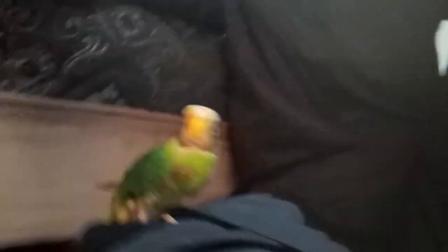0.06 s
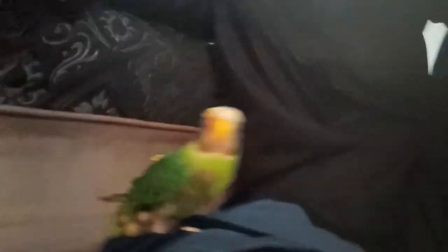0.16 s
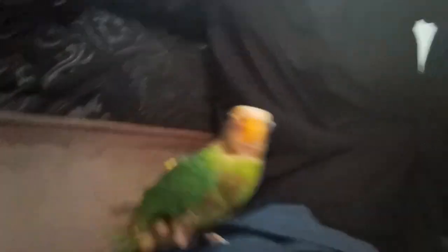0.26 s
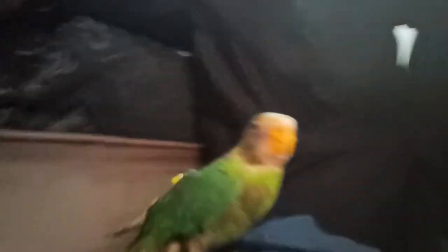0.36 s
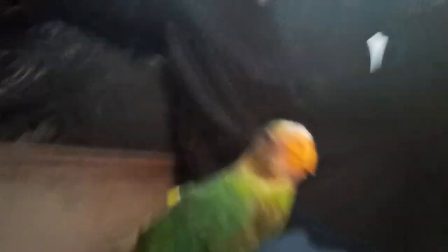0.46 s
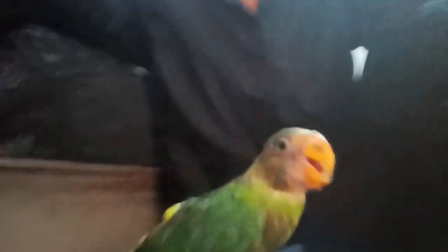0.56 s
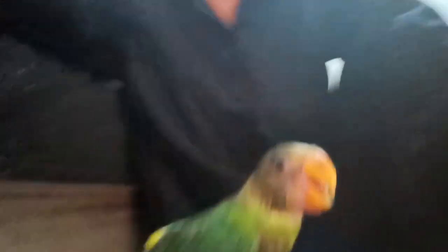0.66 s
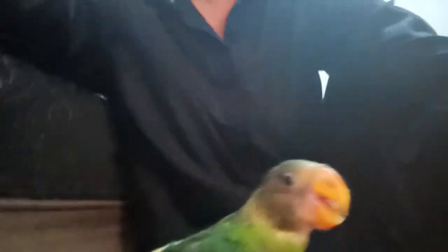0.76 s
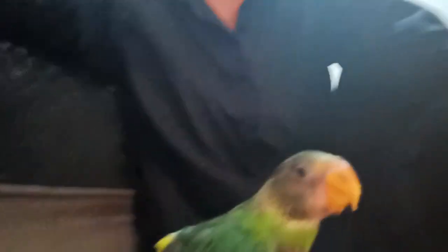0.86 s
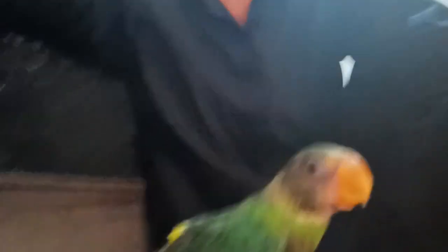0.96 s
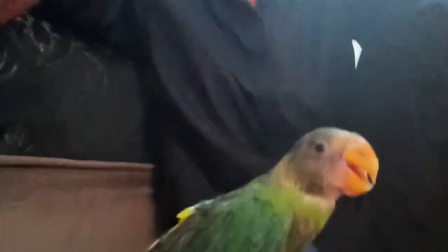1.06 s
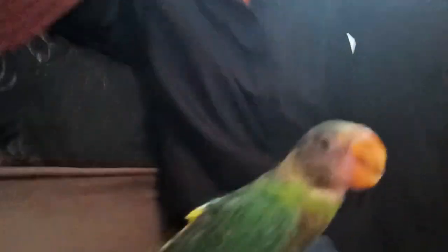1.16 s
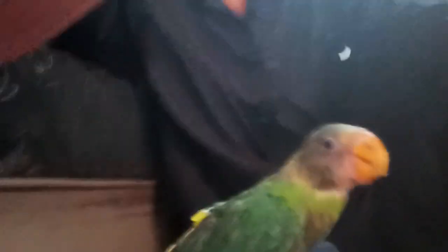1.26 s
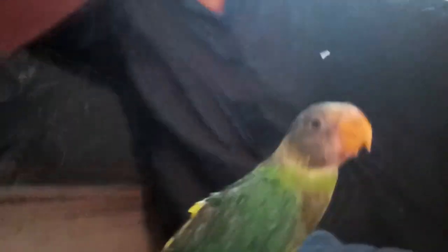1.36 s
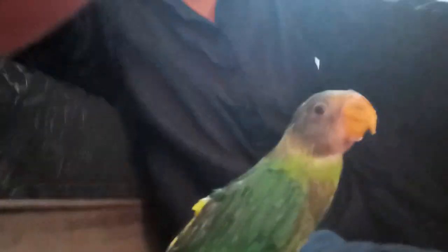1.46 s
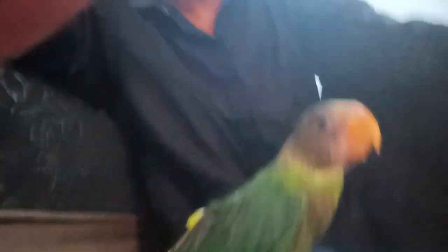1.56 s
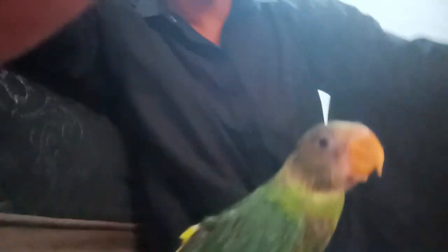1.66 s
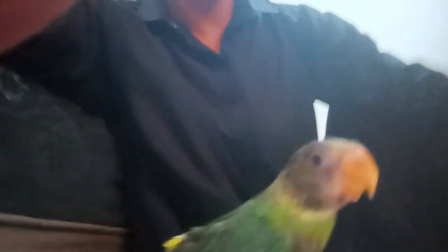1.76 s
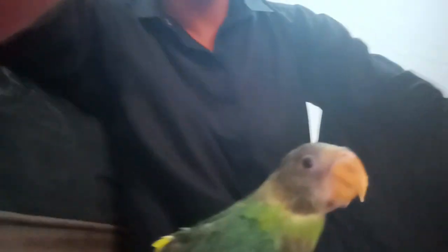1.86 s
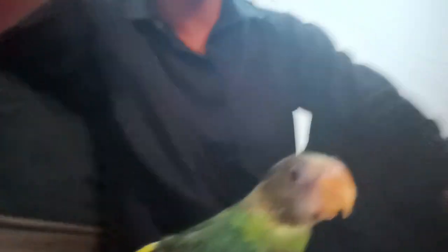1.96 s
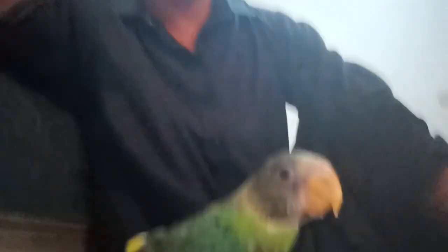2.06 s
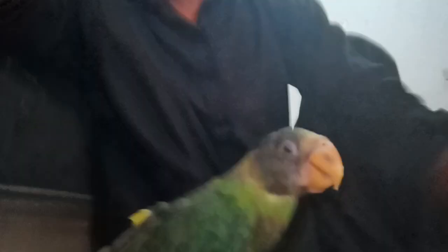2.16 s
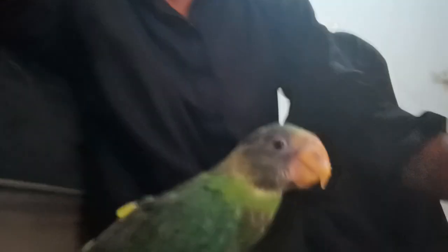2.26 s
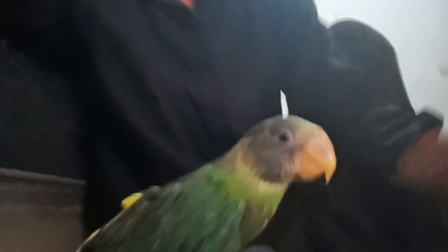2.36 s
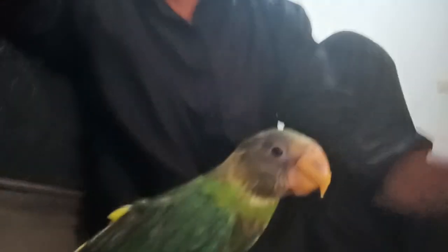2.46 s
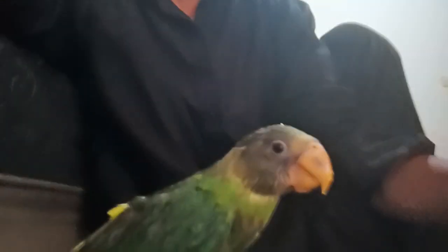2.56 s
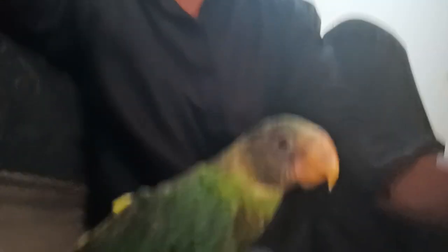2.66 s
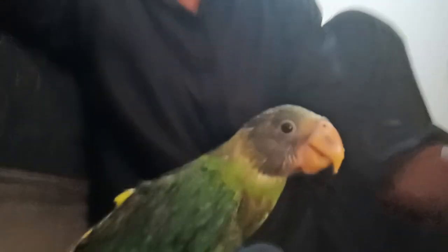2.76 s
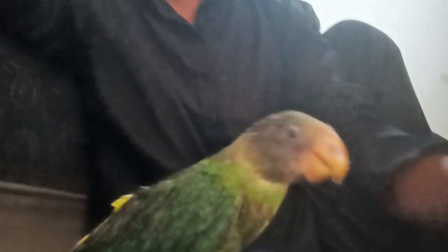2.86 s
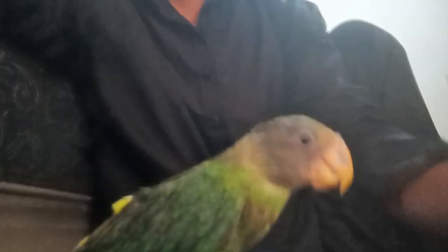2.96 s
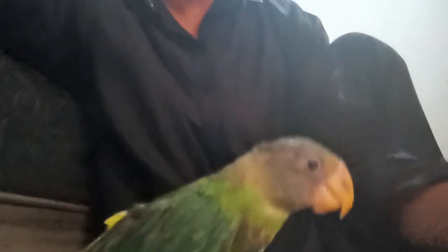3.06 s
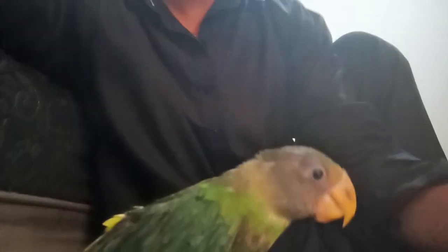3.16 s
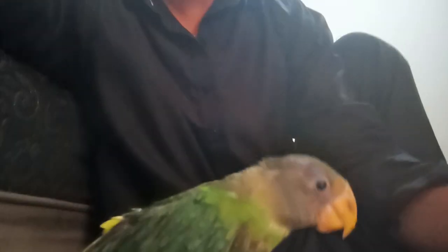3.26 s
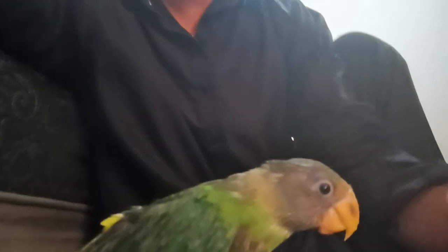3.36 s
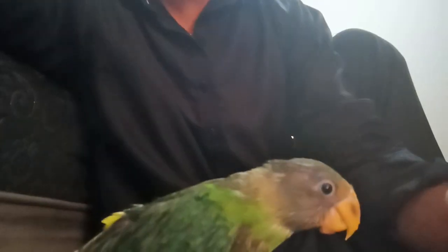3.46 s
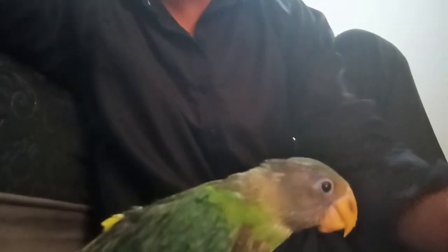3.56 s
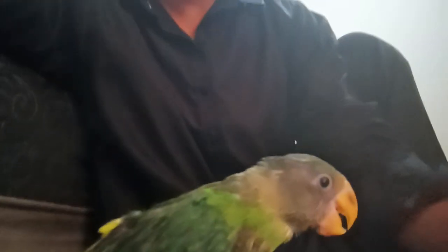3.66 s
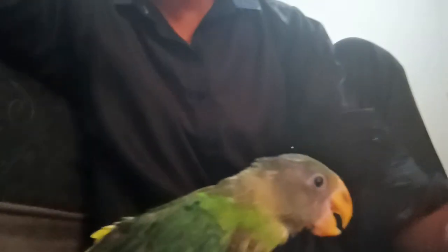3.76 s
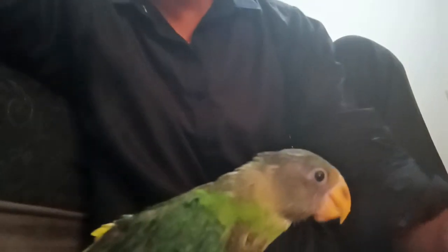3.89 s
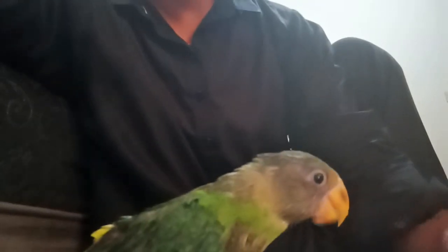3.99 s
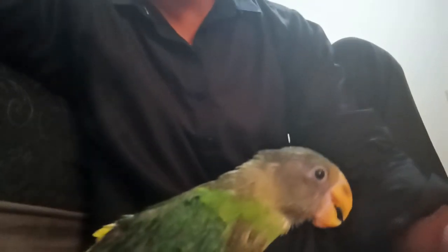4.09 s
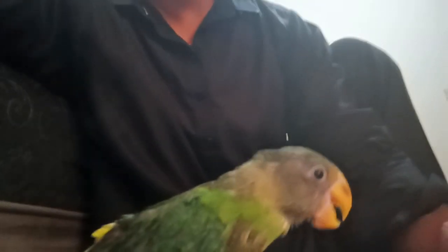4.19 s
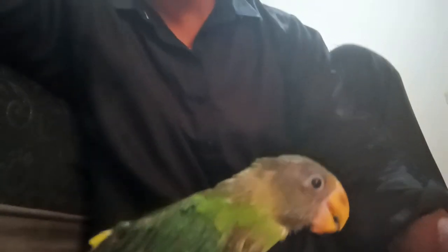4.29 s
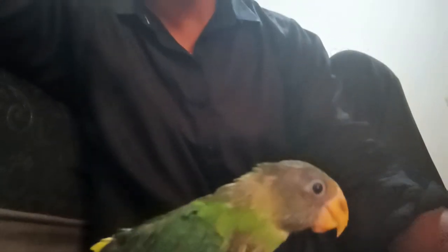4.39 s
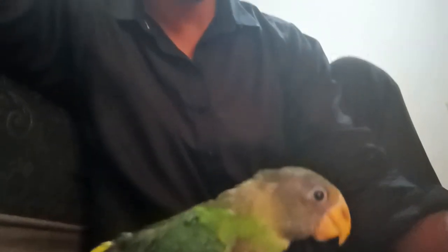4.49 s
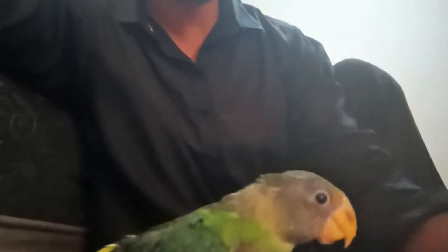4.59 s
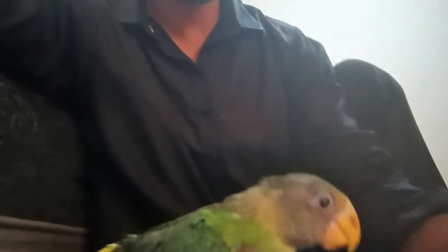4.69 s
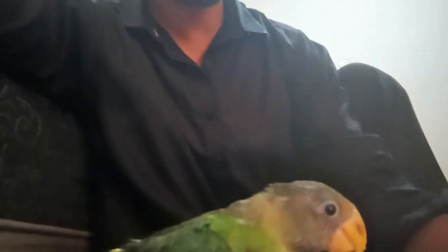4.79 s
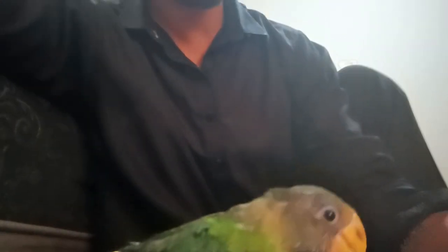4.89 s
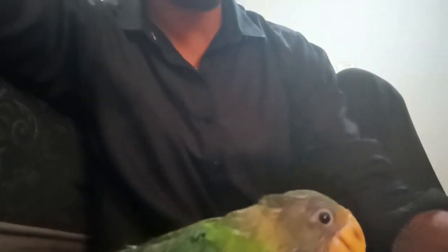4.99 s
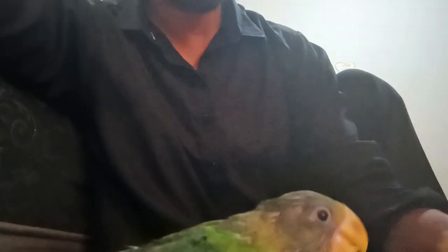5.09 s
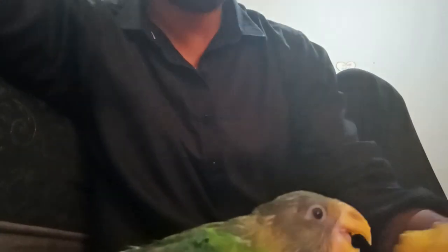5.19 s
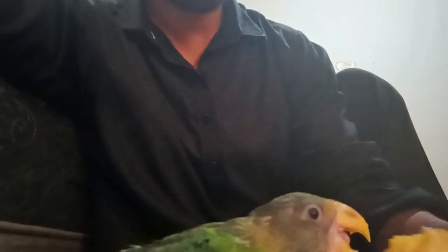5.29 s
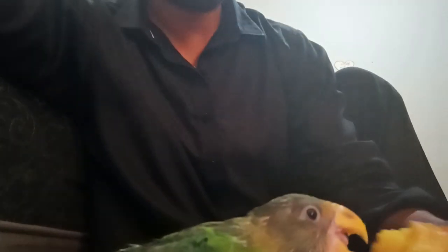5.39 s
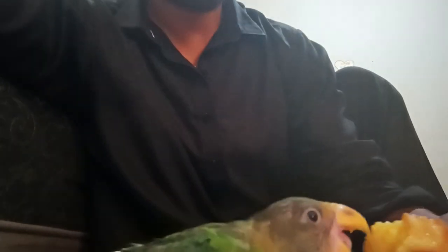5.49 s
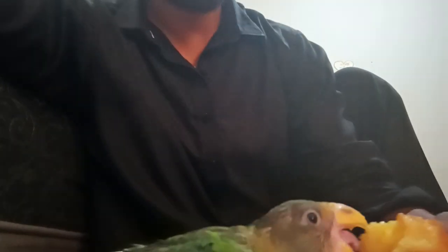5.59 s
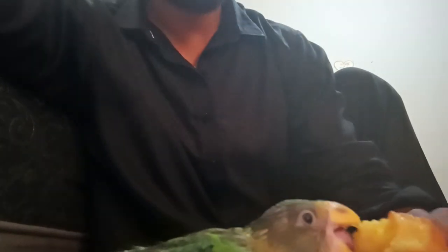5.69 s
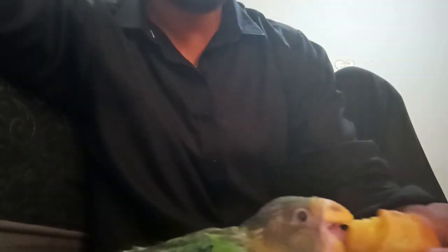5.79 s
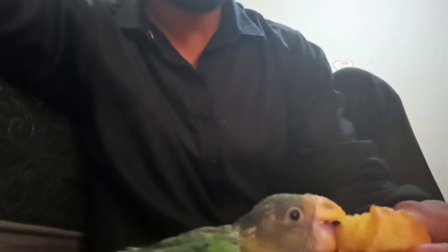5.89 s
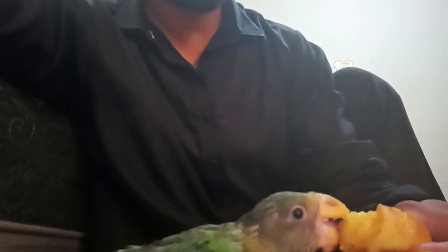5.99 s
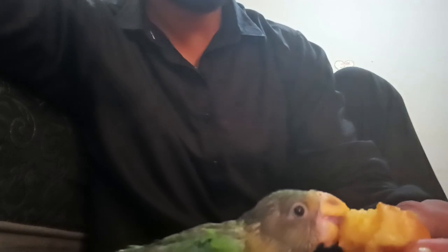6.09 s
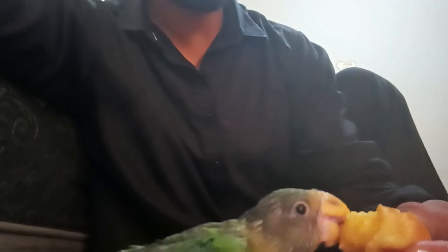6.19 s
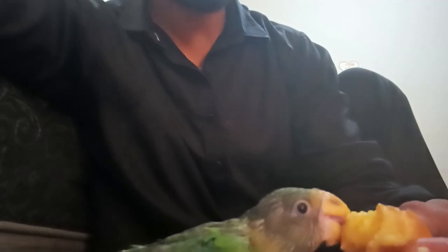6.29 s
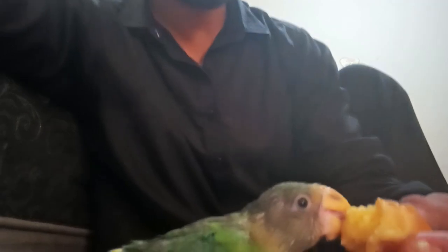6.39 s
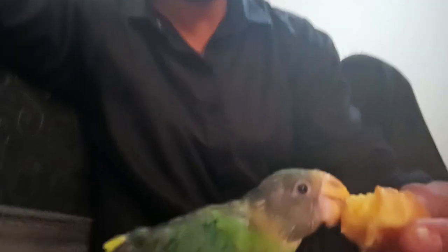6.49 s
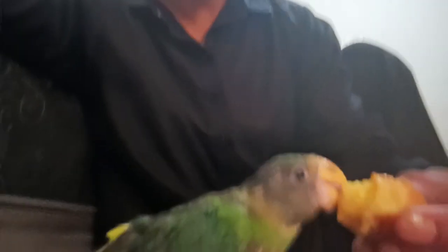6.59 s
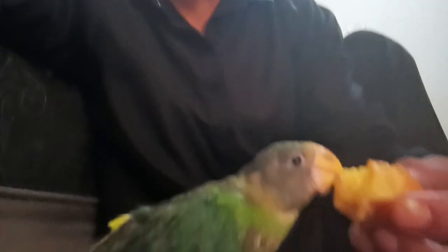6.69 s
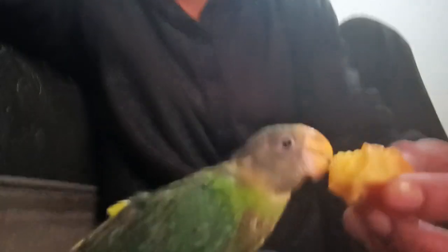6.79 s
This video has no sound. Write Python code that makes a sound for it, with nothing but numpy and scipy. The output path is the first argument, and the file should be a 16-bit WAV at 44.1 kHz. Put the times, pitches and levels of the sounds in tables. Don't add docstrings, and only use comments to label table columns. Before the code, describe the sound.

Two loud pairs of shrill, buzzing parrot calls ring out indoors, with soft handling bumps, air puffs and steady fan noise between.

```python
import sys
import numpy as np
from scipy import signal
from scipy.fft import rfft, irfft, next_fast_len
from scipy.io import wavfile
from scipy.ndimage import uniform_filter1d, minimum_filter1d

SR = 44100
rng = np.random.default_rng(int(sys.argv[2]) if len(sys.argv) > 2 else 0)


def elevation(decibels):
    levels = np.asarray(decibels, float)
    return 10 ** (levels / 20)


def generate_wav(signal):
    frames = np.transpose(np.atleast_2d(signal))
    scaled = np.clip(frames, -1, 1) * 32767
    pcm = np.round(scaled).astype(np.int16)
    wavfile.write(sys.argv[1], SR, pcm)


N = 301714
CUTOFF_HZ = 16000

# [t/s, pitch f/Hz, level/dB]
OPENINGS = [
    [(.4642, 648, -24), (.470, 730, -18), (.477, 882, -13.5), (.4805, 1070, -9), (.4815, 1150, -10.5)],
    [(.9165, 558, -16), (.921, 626, -12), (.931, 892, -18), (.9345, 1030, -15), (.937, 1260, -7.5)],
    [(3.545, 560, -27), (3.550, 759, -20), (3.558, 971, -14.5), (3.5605, 1030, -11.5), (3.5645, 1520, -10)],
    [(3.988, 636, -28), (3.998, 912, -15.5), (4.004, 1016, -21), (4.0065, 1070, -19), (4.0125, 1720, -9.5)],
]
# [t/s, pitch f/Hz, level/dB]
CLOSINGS = [
    [(.7124, 2150, -12.5), (.718, 1572, -11.5), (.727, 1290, -12), (.733, 1140, -25)],
    [(1.1465, 2990, -13.5), (1.155, 1760, -24), (1.162, 1530, -18.5), (1.173, 1170, -24)],
    [(3.7805, 3080, -11.5), (3.789, 1640, -17), (3.798, 1370, -12), (3.808, 1060, -25)],
    [(4.225, 2980, -9), (4.2315, 1700, -14), (4.238, 1390, -11), (4.246, 1200, -20)],
]
# [breath noise/dB, second overtone/dB, room/dB, gain ducking/dB,
#                    shrillness/dB per octave of overtone]
MANNER = [(-28, -3, -22, -16.5, -1), (-45, -0.5, -17, -15.5, -2), (-27.5, -3, -11, -8.5, -0.7),
          (-30.5, -2.5, -11, -6, -0.64)]


def rms_one(x):
    return x / np.sqrt(np.mean(x ** 2) + 1e-20)


def level_of(rows):
    s, db = np.transpose(rows)
    return elevation(np.interp(np.arange(N) / SR, s, db))


def at_hz(points, hz):
    points_hz, points_db = np.transpose(points)
    return np.interp(np.log(hz), np.log(points_hz), points_db)


def drift(rate, count):
    r = np.exp(-2 * np.pi * rate / SR)
    return rms_one(signal.lfilter([1], [1, -2 * r, r * r], rng.standard_normal(count + 9000))[9000:])


def coloured(spectrum, count):
    hz = np.maximum(np.fft.rfftfreq(count, 1 / SR), 1)
    return rms_one(irfft(rfft(rng.standard_normal(count)) * elevation(at_hz(spectrum, hz)), count))


def parrot():
    # [first crest t/s, first period/ms, slowing/ms per warble, head start/warbles, pitch factor]
    warbling = [(.4944, 14.83, .178, 0, 1), (.9506, 15.84, .084, -.1, .995),
                (3.578, 15.42, .036, .4, 1.005), (4.027, 15.6, .2, .9, 1.022)]
    # [t/s, crest level/dB, valley level/dB]
    efforts = [
        [(.49, -9.5, -24.5), (.52, -8, -21.5), (.54, -9.5, -18.5), (.58, -2.5, -23.5), (.65, -12.5, -21.5),
         (.70, -8.5, -16)],
        [(.945, -6.5, -19), (.96, -14, -19.5), (.99, -7, -15.5), (1.025, -9, -19), (1.1, -10.5, -21),
         (1.14, -13, -17)],
        [(3.572, -8, -33), (3.584, -11.5, -25.5), (3.6, -11, -19.5), (3.675, -9, -15.5), (3.72, -11, -20),
         (3.775, -12.5, -19)],
        [(4.018, -11, -25), (4.036, -12, -16), (4.075, -8, -11.5), (4.135, -9, -11), (4.17, -8.5, -19.5),
         (4.22, -9, -13.5)],
    ]
    # [f/Hz, level/dB]
    throat_aside = [(900, 2), (1800, 16), (2480, 30), (2800, 26), (3080, 26.5), (3600, 18.5), (4300, 21.5),
                    (5300, 16.5), (6100, 21), (7100, 10), (8200, 13.5), (9400, 0), (13000, -2.5),
                    (15200, 8.5)]
    throat_turning = [(900, 3.5), (1800, 15), (2480, 27.1), (2800, 23.4), (3080, 25.2), (3600, 19),
                      (4300, 25), (5300, 19), (6100, 21.6), (7100, 6), (8200, 17), (10500, 9.3),
                      (13500, 0.5), (15200, 14)]
    throat_facing = [(900, 8), (1800, 17.3), (2550, 21.2), (2800, 24.8), (3100, 27), (3600, 21.6),
                     (4300, 25.3), (5200, 20.2), (6200, 24.6), (7100, 6), (8500, 23.3), (9600, 13),
                     (11500, 2), (14800, 11)]
    throats = [throat_aside, throat_turning, throat_facing, throat_facing]
    near, far, gain = np.zeros(N), np.zeros(N), automatic_gain()
    for *course, throat, manner in zip(OPENINGS, warbling, efforts, CLOSINGS, throats, MANNER):
        breath_db, second_db, room_db, _, shrill_db = manner
        points = turning_points(*course)
        call = squawk(points, throat, breath_db, second_db, shrill_db)
        start = round(points[0, 0] * SR)
        span = slice(start, start + len(call))
        near[span] = call / gain[span]
        far[span] = near[span] * elevation(room_db)
    return near + near_echoes(near) + room(far)


def squawk(points, throat, breath_db, second_db, shrill_db):
    overtones_db = [-0.06, 1, -8.5, -6, -11, -14.5, -16, -15.5]
    pointed_stroke = [(0, 0, 0), (.12, .03, -.06), (.4, .48, .38), (.56, .62, .68), (.74, .88, .91),
                      (1, 1, 1)]
    round_stroke = [(0, 0, 0), (.12, .05, -.03), (.4, .6, .5), (.56, .76, .8), (.74, .93, .95), (1, 1, 1)]
    s, hz, db, bend = points.T
    place = np.interp(np.arange(s[0], s[-1], 1 / SR), s, np.arange(len(s)))
    i = place.astype(int)
    gliding, rising, falling = bend[i] == 0, bend[i] > 0, bend[i] < 0
    up = np.where(falling, 1 - place + i, place - i)

    def along(rise, fall):
        return np.where(gliding, up, np.where(rising, rise, 1 - fall))

    def stroke_share(rows):
        at, rise, fall = np.transpose(rows)
        return along(np.interp(up, at, rise), np.interp(up, at, fall))

    def opened(speed):
        return np.sin(np.pi / 2 * np.minimum(speed * up, 1))

    rounded = np.interp(np.maximum(hz[i], hz[i + 1]), [2600, 3100], [0, 1])
    share = (1 - rounded) * stroke_share(pointed_stroke) + rounded * stroke_share(round_stroke)
    pitch = uniform_filter1d(hz[i] + (hz[i + 1] - hz[i]) * share, size=31)
    pitch = pitch * (1 + .004 * drift(300, len(i)))
    turn = 2 * np.pi * np.cumsum(pitch) / SR

    order = np.arange(1, 25)[:, None]
    source_db = np.interp(order, np.arange(1, 9), overtones_db) + shrill_db * np.log2(order)
    source_db = source_db + second_db * (order == 2)

    def weigh(f):
        return elevation(source_db + at_hz(throat, order * f)) * (order * f < CUTOFF_HZ)

    swell = along(opened(2.3), opened(0.91))
    effort_db = db - 10 * np.log10(np.sum(weigh(hz) ** 2, axis=0) / 2)
    effort_db += np.interp(hz, [2300, 3000], [2., .4]) - 3 * (bend > 0)
    effort = elevation(effort_db[i] + (effort_db[i + 1] - effort_db[i]) * swell)

    slack = uniform_filter1d(falling * (1 - up ** 2), size=40)
    patchy = np.array([drift(250, len(i)) for k in order]) * np.where(gliding, .4, 1)
    grain = elevation(np.log2(order) * (1.5 * patchy - 2.5 * slack) + .4 * patchy)
    overtones = np.sin(order * turn + rng.uniform(0, 2 * np.pi, order.shape))
    tone = np.sum(weigh(pitch) * grain * overtones, axis=0)
    breath = coloured([(700, -30), (1500, 6)] + throat[1:], len(i))
    breath = breath * (1 + .5 * np.cos(turn)) * elevation(breath_db + 22)
    count = np.arange(len(i))
    edge = np.minimum(1, np.minimum(count, count[::-1]) / (.0015 * SR))
    return effort * edge * (tone + breath)


def turning_points(opening, warbling, effort, closing):
    # [warble number, valley f/Hz, crest f/Hz]
    climb = [(0, 1010, 2040), (1, 1220, 2240), (3, 1390, 2570), (4, 1500, 2810), (5, 1650, 2970),
             (6.5, 1750, 3070), (9, 1850, 3080), (14, 1900, 3130)]
    rise_share, waver_hz, waver_db = .59, 25, .5
    first_s, period_ms, slowing_ms, head_start, factor = warbling
    k = np.arange(20)
    periods = (period_ms + slowing_ms * k) / 1000
    crest_s = first_s + np.cumsum(periods) - periods
    valley_s = crest_s - rise_share * (periods - slowing_ms / 1000)
    number, low, high = np.transpose(climb)
    s, crest_db, valley_db = np.transpose(effort)
    waver = rng.standard_normal((4, len(k)))
    valleys = [valley_s,
               factor * np.interp(k + head_start, number, low) + waver_hz * waver[0],
               np.interp(valley_s, s, valley_db) + waver_db * waver[1],
               np.ones(len(k))]
    crests = [crest_s,
              factor * np.interp(k + head_start, number, high) + waver_hz * waver[2],
              np.interp(crest_s, s, crest_db) + waver_db * waver[3],
              -np.ones(len(k))]
    warbles = np.transpose([valleys, crests], (2, 0, 1)).reshape(-1, 4)
    warbles = warbles[:2 * np.sum(valley_s < closing[0][0] - .002) - 1]
    rows = np.vstack([np.c_[opening, [0, 0, 0, 1, -1]], warbles, np.c_[closing, [-1, 0, 0, 0]]])
    rows[:, 0] = np.maximum.accumulate(rows[:, 0] + 1e-6 * np.arange(len(rows)))
    return rows


def near_echoes(x):
    # [delay/ms, level/dB]
    echoes = [(1.1, -10), (2.3, -12), (3.9, -14), (6.1, -17)]
    highs = signal.sosfilt(signal.butter(2, 5500, "high", fs=SR, output="sos"), x)
    return sum(elevation(db) * np.roll(highs, round(ms * SR / 1000)) for ms, db in echoes)


def room(x):
    # [f/Hz, level/dB]
    wall_colour = [(1500, -2), (2500, -1.5), (2950, -0.5), (3600, 3.5), (6000, -2.5), (10000, -1),
                   (16000, 2)]
    t60_s, wall_cut_hz = 0.33, 11100
    size = next_fast_len(N + SR)
    w = 2 * np.pi * np.fft.rfftfreq(size)
    dull = np.exp(-2 * np.pi * wall_cut_hz / SR)
    wall = (1 - dull) / (1 - dull * np.exp(-1j * w))
    tail = 0
    for k, lag in enumerate(rng.uniform(.011, .04, 10) * SR):
        absorbed = elevation(-60 * lag / SR / t60_s) * wall ** (lag / SR / 0.087)
        loop = absorbed * np.exp(-1j * w * lag)
        tail = tail + (-1) ** k * loop / (1 - loop)
    for lag in (53, 181):
        delay = np.exp(-1j * w * lag)
        tail = tail * (delay - .6) / (1 - .6 * delay)
    tail = tail * elevation(at_hz(wall_colour, np.maximum(w * SR / (2 * np.pi), 1)))
    return irfft(rfft(x, size) * tail, size)[:N] / 3


def knocks(rows, crack_db):
    out, t = np.zeros(N + SR), np.arange(SR // 10) / SR
    for s, db, hz, t60 in rows:
        wander = .6 * np.cumsum(rng.standard_normal(len(t))) * np.sqrt(hz / SR)
        ring = np.sin(2 * np.pi * hz * t + wander)
        crack = coloured([(hz / 4, -12), (hz, 0), (hz * 4, -9), (hz * 16, -32), (hz * 64, -75)], len(t))
        fade = elevation(db - 60 * t / max(t60, .002))
        start = round(s * SR)
        out[start:start + len(t)] += fade * (ring + elevation(crack_db) * crack)
    return out[:N]


def touches():
    # [t/s, peak level/dB, f/Hz, t60/s]
    bumps = [
        (.9752, -10, 496, 0.013),
        (1.001, -14.5, 202, 0.011),
        (1.012, -22.5, 600, 0.015),
        (1.018, -30, 250, .012),
    ]
    # [t/s, peak level/dB, f/Hz, t60/s]
    ticks = [
        (2.9612, -54, 12700, 0.012),
        (4.6084, -49.5, 13500, 0.012),
        (4.9501, -57, 13700, 0.013),
        (5.8994, -67, 13100, 0.012),
    ]
    return knocks(bumps, crack_db=2.0) / automatic_gain() + knocks(ticks, crack_db=-2)


def rustles():
    # [f/Hz, level/dB per Hz]
    cloth_spectrum = [(760, -41.5), (1300, -10), (1740, -2.5), (2590, -5.5), (3560, -25), (4100, -51),
                      (7000, -38.5), (9100, -79), (15400, -120)]
    # [t/s, level/dB]
    cloth_level = [(0, -40.5), (.2, -41), (.45, -41), (.85, -36.5), (1.3, -68), (1.6, -67), (6.84, -71)]
    # [t/s, level/dB]
    brush = [
        (5.15, -79),
        (5.21, -60),
        (5.28, -57),
        (5.36, -81),
    ]
    cloth = level_of(cloth_level) * coloured(cloth_spectrum, N) * elevation(1.8 * drift(9, N))
    sweep = level_of([(brush[0][0] - .03, -110)] + brush + [(brush[-1][0] + .03, -110)])
    feathers = coloured([(3000, -26.5), (8000, -1.5), (10500, -16.0), (12500, -7), (15500, -5.0)], N)
    return cloth + sweep * feathers


def draught():
    # [t/s, peak level/dB, time to fall 20 dB/s]
    puffs = [(.4, -43, .11), (.88, -50, .07), (1.0, -32, .035), (1.36, -25.5, .075), (1.52, -30, .06),
             (1.69, -45, .25), (1.83, -35, .1), (1.97, -42, .13), (2.13, -32.5, .055), (3.26, -40, .08),
             (3.35, -47, .06), (3.58, -43, .17), (3.86, -26, .05), (3.95, -39, .1), (4.23, -42, .22),
             (4.5, -35, .07), (4.66, -33, .08), (4.8, -39.5, .1), (5.0, -52, .2), (5.28, -55, .08),
             (5.66, -40, .055), (6.04, -37, .05), (6.2, -51, .18), (6.5, -37, .06), (6.63, -34, .08),
             (6.77, -32, .08)]
    sharpness, still_air_db = 1.4, -68
    rumble = coloured([(15, -30.5), (40, -8.0), (70, -3), (110, -1), (200, -12.5), (500, -31), (2000, -89)], N)
    t = np.arange(0, N, 50) / SR
    air = elevation(still_air_db) + sum(elevation(db - 20 * np.abs((t - s) / fall) ** sharpness) for s, db, fall in puffs)
    air = np.interp(np.arange(N) / SR, t, air)
    return elevation(-3.0) * air / automatic_gain() * rms_one(rumble * elevation(2.7 * drift(27, N)))


def fan(patchy_db=1.32):
    # [f/Hz, level/dB per Hz]
    fan_spectrum = [(47, -49), (80, -18), (248, -1.5), (378, -2), (751, -15), (958, -6), (1090, -5),
                    (1400, -12.5), (1740, -11), (5900, -38.5), (7360, -47), (9400, -46), (10500, -55.5),
                    (12800, -60), (16000, -56.5)]
    # [t/s, level/dB]
    fan_level = [(0, -36), (.44, -37.5), (1.4, -38.5), (2.7, -39), (4.5, -38), (6.84, -37.5)]
    # [t/s, level/dB]
    fan_hiss = [(0, -5.5), (.45, -5), (1.5, 0), (2.3, 0.5), (3.4, 1), (4.7, 0.4), (5.3, 0.5), (6.84, 0)]
    drone, out, together = rfft(coloured(fan_spectrum, N)), 0, drift(4.3, N)
    octave = np.log2(np.maximum(np.fft.rfftfreq(N, 1 / SR), 1) / 60)
    for k in range(9):
        overlap = np.clip(1 - np.abs(np.clip(octave, 0, 8) - k), 0, 1)
        band = irfft(drone * overlap, N)
        band = band * level_of(fan_hiss) ** np.clip(k - 5, 0, 2)
        out = out + band * elevation(patchy_db * (0.58 * together + drift(17, N)))
    return elevation(3.5) * level_of(fan_level) * rms_one(out)


def suppressor_blotches(x, depth_db):
    hz, s, z = signal.stft(x, SR, nperseg=1024)
    field = uniform_filter1d(rng.standard_normal(z.shape), size=3, axis=0)
    field = uniform_filter1d(field, size=7, axis=1)
    holes_db = np.minimum(rms_one(field) + .5, 0) * np.interp(hz, [2500, 5000, 11000], [0, .7, 1])[:, None]
    frames = uniform_filter1d(rng.standard_normal(len(s)), size=4) * 2
    top_db = 3.3 * frames * (hz > 11500)[:, None]
    return signal.istft(z * elevation(depth_db * holes_db + top_db), SR)[1][:N]


def automatic_gain():
    duck_s, recover_s = 0.048, 0.057
    t, total_db = np.arange(N) / SR, np.zeros(N)
    for opening, closing, manner in zip(OPENINGS, CLOSINGS, MANNER):
        start, end = opening[0][0], closing[-1][0]
        sink = 1 - np.exp(-np.clip(t - start, 0, end - start) / duck_s)
        total_db += manner[3] * sink * np.exp(-(np.maximum(t - end, 0) / recover_s) ** 2)
    return elevation(total_db)


def limit(x):
    ceiling, release_db_s = .88, 150
    over_db = np.maximum(20 * np.log10(np.abs(x) / ceiling + 1e-9), 0)
    ramp = release_db_s * np.arange(N) / SR
    held = np.maximum.accumulate(-minimum_filter1d(-over_db, size=89) + ramp, axis=-1) - ramp
    return x * elevation(-uniform_filter1d(held, size=45))


def scene():
    drone = suppressor_blotches(fan(), depth_db=14.0)
    return (parrot() + touches() + rustles() + draught() + drone)[None]


def band_limit(x):
    return signal.sosfilt(signal.butter(12, 16500, fs=SR, output="sos"), x)


def record(dry):
    bass_cut = signal.butter(2, 76, "high", fs=SR, output="sos")
    top_cut = signal.ellip(10, .5, 70, CUTOFF_HZ - 200, fs=SR, output="sos")
    mix = signal.sosfilt(np.vstack([bass_cut, top_cut]), limit(dry * automatic_gain()))
    return band_limit(mix)


dry = scene()
out = record(dry)
generate_wav(out)
```